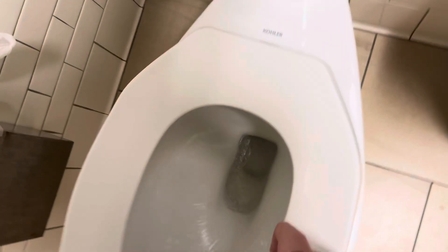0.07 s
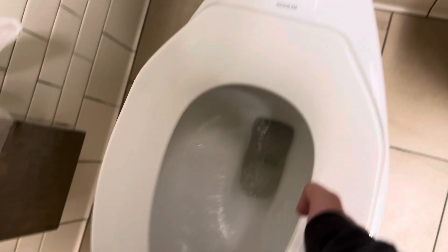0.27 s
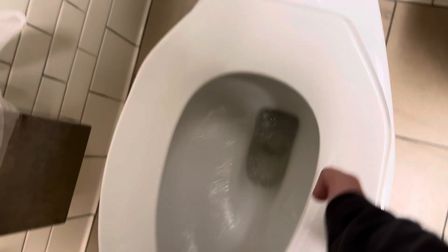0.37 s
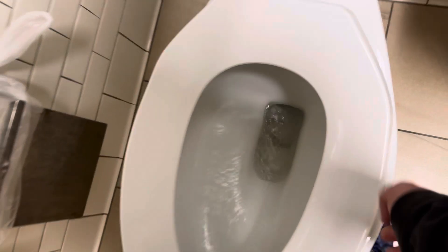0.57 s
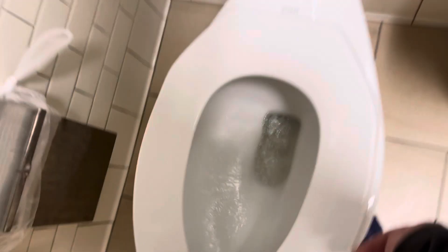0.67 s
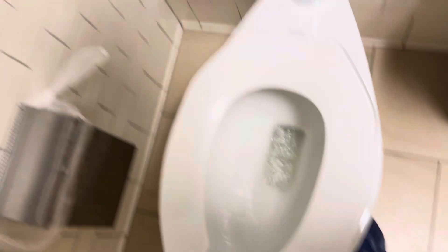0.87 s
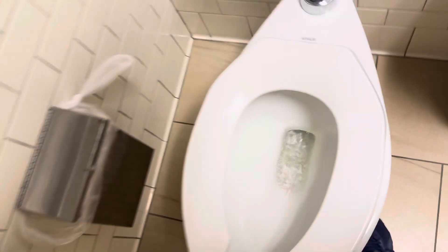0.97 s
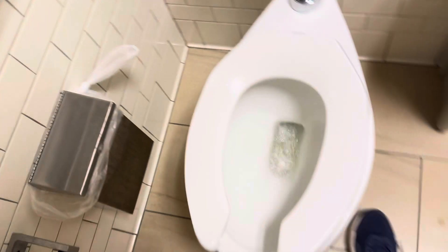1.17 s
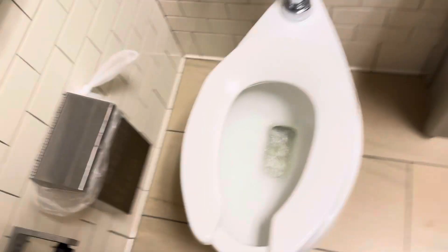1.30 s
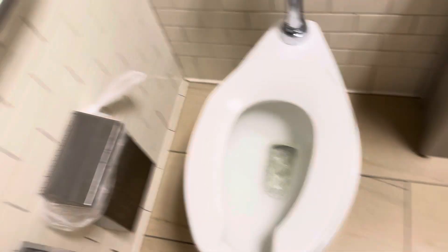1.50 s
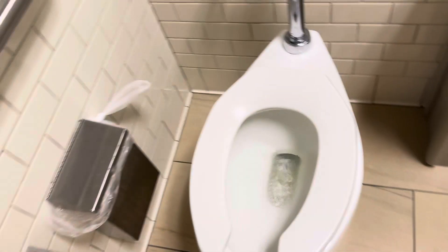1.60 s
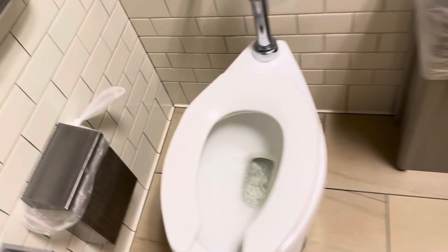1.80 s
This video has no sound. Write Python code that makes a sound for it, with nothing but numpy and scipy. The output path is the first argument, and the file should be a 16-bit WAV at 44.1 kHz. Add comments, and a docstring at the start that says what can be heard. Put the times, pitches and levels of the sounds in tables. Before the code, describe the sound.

A plastic toilet seat drops onto the porcelain bowl nearby with one sharp bang that rings briefly in a small tiled restroom. Faint clothing rustle and two soft footsteps follow over a low ventilation hum.

```python
"""Small tiled restroom: a plastic toilet seat drops onto the porcelain bowl.
Its bumpers land within milliseconds: one hard clack, then a smaller rebound. Bowl and stall ring
in beating mode pairs; the ceiling returns a slap, the tiles a bright tail.
Ventilation hums throughout. A brief low rumble precedes the drop.
Clothes rustle and shoes knock softly as someone steps back."""
import sys
import numpy as np
from scipy import signal
from scipy.fft import rfft, irfft, next_fast_len
from scipy.io import wavfile

SR = 44100
rng = np.random.default_rng(int(sys.argv[2]) if len(sys.argv) > 2 else 0)


def materialize(psi):
    """Save the field psi as 16-bit PCM at rate SR to the path in sys.argv[1].

    A 1-D psi becomes a single channel; in a 2-D psi each row is a channel.
    """
    bounded = np.clip(np.atleast_2d(psi).T, -1, 1)
    quanta = np.round(bounded * 32767).astype(np.int16)
    wavfile.write(sys.argv[1], SR, quanta)


N = 81585
FFT_SIZE = next_fast_len(N)
TIME_S = np.arange(N) / SR
BIN_HZ = np.maximum(np.fft.rfftfreq(FFT_SIZE, 1 / SR), 1)

# Stereo likeness of the room. Each row: frequency in Hz, left-right correlation.
ROOM_CORRELATION = [(80, 1), (280, .82), (600, 0.84), (1200, 0.53), (4000, .25), (12000, 0.3)]
# Duct rumble. Each row: frequency in Hz, relative density in dB.
DUCT_SPECTRUM = [(25, -19), (45, -12), (65, -5.5), (90, 0), (125, -9.5), (175, -8.5), (230, -22),
                 (300, -22), (420, -28), (600, -36), (850, -43.5), (2000, -56), (5000, -61.5), (9000, -66),
                 (11000, -45.5), (15500, -63.5)]
# Ventilation hum. Each row: centre in Hz, level in dB, width in Hz.
HUM_LINES = [(89.5, -48, 30), (117.93, -54, 7.3), (146, -57, 8), (188, -56.5, 29), (286.4, -68.5, 8.6),
             (580, -77, 6.1)]
# Rustle envelope. Each row: time in seconds, level in dB.
RUSTLE_LEVELS = [(0, -62.5), (.08, -72.5), (.5, -72.5), (.7, -72.5), (.93, -73), (1.02, -68.5), (1.18, -75),
                 (1.3, -93), (1.47, -75.5), (1.62, -78.5), (1.65, -68), (1.74, -64), (1.85, -64.5)]
# Cloth friction. Each row: frequency in Hz, relative density in dB.
CLOTH_SPECTRUM = [(300, 1.5), (1000, 2), (2200, 1), (3000, -3.5), (4500, -5), (7500, -8), (9500, -20),
                  (15500, -17.5)]
# Jacket brushes. Each row: start in seconds, level in dB, rise in seconds, T60 in seconds,
# centre in Hz, half width in octaves.
JACKET_BRUSHES = [(0.015, -60, 0.00054, 0.066, 3800, 0.38), (0.081, -62, 0.0092, 0.2, 7030, 0.062),
                  (.114, -60, 0.00083, 0.027, 2460, 0.89), (0.167, -65.5, .003, 0.14, 4000, 0.61),
                  (.44, -57.5, 0.021, 0.46, 4170, 0.53), (.665, -59, 0.023, 0.16, 4430, 0.43),
                  (.83, -64, .008, .2, 4570, 0.54), (.872, -67.5, 0.0038, 0.15, 4960, 0.55),
                  (.995, -64, 0.0153, .25, 2590, 1), (1.075, -69, .006, 0.12, 4500, .5),
                  (1.18, -60, 0.023, 0.19, 8000, 0.86), (1.722, -59.5, 0.0089, 0.13, 3000, .8),
                  (1.823, -56.5, .0005, .09, 11200, 0.47), (1.828, -57.5, 0.0044, 0.13, 6460, 0.093)]
# Low swell. Each row: frequency in Hz, relative density in dB.
SWELL_SPECTRUM = [(30, -4.5), (130, 3.5), (290, -1.5), (450, -22.5), (1500, -47)]
# Shoe knocks. Each row: start in seconds, level in dB, low-pass cutoff in Hz.
SHOE_KNOCKS = [(0.104, -57.5, 1497), (0.796, -60.5, 1410), (1.636, -45.5, 980), (1.776, -46, 2200)]
# Knock colour. Each row: frequency in Hz, relative density in dB.
SHOE_SPECTRUM = [(100, -7), (280, 3), (550, -3.5), (1000, -2), (1500, -11), (3000, -15), (8000, -24.5)]
# Bumper landings, the last two on the rebound. Each row: start in seconds, gain in dB,
# low-pass cutoff in Hz.
BUMPER_CONTACTS = [(0.2216, -2, 1400), (0.2249, -5.5, 6200), (0.2258, 2, 11000), (0.2284, -2.5, 6498),
                   (.2336, -10.5, 2200), (0.2584, -6, 2201), (0.2611, -8.5, 3500)]
# Contact crack. Each row: frequency in Hz, relative density in dB.
CRACK_SPECTRUM = [(150, -22), (400, -1), (1000, 0), (2500, -1.5), (4500, -4.5), (7500, -8.5), (9100, -20.5),
                  (11000, -6), (15500, -16.5)]
# Stereo likeness of the crack. Each row: frequency in Hz, left-right correlation.
CRACK_CORRELATION = [(500, 0.95), (2500, .3), (9000, -0.19)]
# Seat modes. Each row: frequency in Hz, relative level in dB, T60 in seconds, left minus right in dB.
SEAT_MODES = [(323, -27, .045, -2), (465, -18.5, .026, -2.5), (789, -13.5, .014, 1.5),
              (1041, -12, 0.03, -0.5), (1309, -13, 0.041, -2), (1680, -19, .022, 1),
              (2220, -21.5, 0.007, 2.5), (2600, -21, 0.01752, 2), (3445, -17, 0.034, 4.5),
              (3704, -18.5, 0.027, 3), (3860, -19.5, 0.027, 4.5), (4530, -17.5, .022, 2),
              (4970, -21.5, 0.024, 3.5), (6880, -23.5, 0.028, -0.5)]
# Bowl and stall modes. Each row: frequency in Hz, relative level in dB, T60 in seconds, beat in Hz.
BOWL_MODES = [(262, -29.5, .22, 22), (281, -31, .5, 6), (487, -36, .36, 9), (647, -37, .3, 12),
              (729, -36, .62, 5), (952, -25, .35, 10.5), (1035, -33, .26, 22), (1150, -31, .24, 28),
              (1194, -32, .25, 17), (1298, -31, .29, 26), (1350, -33, .29, 11), (1407, -35, .27, 8),
              (1650, -27, .21, 6), (2342, -33, .22, 15)]
# Tile reverberation. Each row: frequency in Hz, relative density in dB, T60 in seconds.
ROOM_BANDS = [(190, -21, .9), (310, -7.5, .72), (418, -13, .55), (520, -7, .48), (748.6, -7, 0.45),
              (900, -6, .33), (1116, 1, 0.31), (1364, -0.5, .31), (1520, -9, 0.4), (1680, -4, .29),
              (2430, -1, .27), (2950, -8, .28), (4270, -7, 0.26), (6000, -17, .29), (7940, -19.5, 0.26),
              (8498, -36.5, .15), (10714, -26.5, 0.22), (15500, -36.5, .16)]

RING_AGE_S = TIME_S - BUMPER_CONTACTS[0][0] - 0.004   # bowl and room start 4 ms after first contact


def from_db(db):
    """Decibels to gain."""
    return 10 ** (np.asarray(db) / 20)


def unit_rms(x):
    """Scale to rms 1."""
    return x / np.sqrt(np.mean(np.abs(x) ** 2) + 1e-20)


def per_bin(table):
    """A table's second column at each FFT bin, interpolated over log frequency."""
    table = np.array(table)
    return np.interp(np.log(BIN_HZ), np.log(table[:, 0]), table[:, 1])


def to_time(spectrum):
    """Stereo spectrum to N samples."""
    return irfft(spectrum, FFT_SIZE)[:, :N]


def lowpass(x, cutoff_hz):
    """Two-pole low-pass."""
    return signal.sosfilt(signal.butter(2, cutoff_hz, fs=SR, output="sos"), x + 1e-18)


def decay(age_s, t60_s, rise_s=1e-5):
    """Exponential rise and decay from age zero."""
    age_s = np.maximum(age_s, 0)
    return (1 - np.exp(-age_s / rise_s)) * np.exp(-np.log(1000) * np.minimum(age_s / t60_s, 4))


def white_spectrum(correlation=ROOM_CORRELATION):
    """Spectrum of partly correlated stereo white noise."""
    mid, side = rfft(rng.standard_normal((2, FFT_SIZE)))
    alike = per_bin(correlation)
    return np.sqrt((1 + alike) / 2) * mid + np.sqrt((1 - alike) / 2) * side * [[1], [-1]]


def noise(colour, correlation=ROOM_CORRELATION):
    """Coloured stereo noise, rms about 1."""
    return to_time(white_spectrum(correlation) * unit_rms(from_db(per_bin(colour))))


def bandpass_gain(offset):
    """Flat-topped band, rms 1; offset from the centre in half widths."""
    return unit_rms(1 / (1 + offset ** 4))


def split_bands(spectrum, table):
    """Overlapping band signals, one per table row."""
    log_centres = np.log(np.array(table)[:, 0])
    return [to_time(spectrum * np.interp(np.log(BIN_HZ), log_centres, row)) for row in np.eye(len(table))]


def ventilation(duct_db=-47, fan_hz=196.1, fan_db=-50.5, third_db=-70.5):
    """Duct rumble with faint hiss, wavering hum lines, a steady fan note with its third harmonic."""
    duct = from_db(duct_db) * noise(DUCT_SPECTRUM)
    lines = sum(from_db(db) * bandpass_gain(2 * (BIN_HZ - hz) / width_hz)
                for hz, db, width_hz in HUM_LINES)
    hum = to_time(lines * white_spectrum())
    phase = 2 * np.pi * fan_hz * TIME_S
    fan = from_db(fan_db) * np.sin(phase) + from_db(third_db) * np.sin(3 * phase)
    return duct + hum + fan


def clothes(flicker_rms_db=2.5, flicker_cutoff_hz=34.94):
    """Cloth rustles, each band flickering on its own."""
    out = 0
    level_db = np.interp(TIME_S, *np.transpose(RUSTLE_LEVELS))
    cloth = rfft(noise(CLOTH_SPECTRUM), FFT_SIZE)
    for band in split_bands(cloth, CLOTH_SPECTRUM):
        flicker_db = flicker_rms_db * unit_rms(lowpass(rng.standard_normal(N), flicker_cutoff_hz))
        out += from_db(level_db + flicker_db) * band
    return out


def jacket():
    """A moving jacket brushes and ticks: short bursts of bright noise."""
    out, white = 0, white_spectrum()
    for start_s, db, rise_s, t60_s, hz, half_width_oct in JACKET_BRUSHES:
        brush = to_time(white * bandpass_gain(np.log2(BIN_HZ / hz) / half_width_oct))
        out += from_db(db) * decay(TIME_S - start_s, t60_s, rise_s) * brush
    return out


def low_swell(peak_s=0.055, half_width_s=0.12, level_db=-47.5):
    """A low rumble swells and fades before the drop."""
    swell = np.exp(-np.minimum(((TIME_S - peak_s) / half_width_s) ** 2, 20))
    return from_db(level_db) * swell * noise(SWELL_SPECTRUM)


def shoes(t60_s=0.28, rise_s=0.0007):
    """Dull shoe knocks linger in the room."""
    knock = noise(SHOE_SPECTRUM)
    return sum(from_db(db) * lowpass(knock * decay(TIME_S - start_s, t60_s, rise_s), cutoff_hz)
               for start_s, db, cutoff_hz in SHOE_KNOCKS)


def seat(crack_db=-11, crack_t60_s=0.011, stereo_lag_s=0.00003, spread_at_1khz_rad=0.69):
    """Each bumper contact cracks and rings the damped seat; high modes differ more between sides."""
    out = np.zeros((2, N))
    crack = noise(CRACK_SPECTRUM, CRACK_CORRELATION)
    age_s = TIME_S[:SR // 10]
    sides = np.array([[0.5], [-0.5]])
    for start_s, gain_db, cutoff_hz in BUMPER_CONTACTS:
        span = slice(int(start_s * SR), int(start_s * SR) + len(age_s))
        hit = from_db(crack_db) * decay(age_s, crack_t60_s) * crack[:, span]
        for k, (hz, db, t60_s, pan_db) in enumerate(SEAT_MODES):
            skew_rad = spread_at_1khz_rad * np.sqrt(hz / 1000) * rng.standard_normal()
            phase = 2 * np.pi * hz * (age_s - stereo_lag_s * sides) + skew_rad * sides
            hit += (-1) ** k * from_db(db + pan_db * sides) * decay(age_s, t60_s) * np.sin(phase)
        out[:, span] += from_db(gain_db) * lowpass(hit, cutoff_hz)
    return out


def bowl_and_stall(gain_db=2, twin_db=-5.5, rise_s=0.01, spread_rad=0.6):
    """Each long mode beats against a close twin as it dies."""
    out, age_s = np.zeros((2, N)), RING_AGE_S[:SR]
    for hz, db, t60_s, beat_hz in BOWL_MODES:
        phase = 2 * np.pi * hz * age_s + rng.uniform(0, 2 * np.pi)
        phase = phase + spread_rad * rng.standard_normal((2, 1))
        pair = np.sin(phase) + from_db(twin_db) * np.sin(phase + 2 * np.pi * beat_hz * age_s)
        out[:, :SR] += from_db(db + gain_db) * decay(age_s, t60_s, rise_s) * pair
    return out


def room(level_db=-17, rise_s=0.0046):
    """Dense tile reflections, a ceiling slap and a slower tail from beyond the stall."""
    ripple_db, ripple_step_hz = 8.5, 35   # the room favours some pitches over their neighbours
    slap_db, slap_delay_s, slap_t60_s, slap_rise_s = -5, 0.035, 0.078, 0.00087
    late_db, late_t60_ratio, late_max_t60_s = -22, 3, 0.81
    ripple = np.interp(BIN_HZ / ripple_step_hz, np.arange(SR // 10), rng.uniform(-1, 1, SR // 10))
    colour = unit_rms(from_db(per_bin(ROOM_BANDS) + ripple_db * ripple))
    field = from_db(level_db) * colour * white_spectrum()
    slap = from_db(slap_db) * decay(RING_AGE_S - slap_delay_s, slap_t60_s, slap_rise_s)
    out = 0
    for band, (_, _, t60_s) in zip(split_bands(field, ROOM_BANDS), ROOM_BANDS):
        early = decay(RING_AGE_S, t60_s, rise_s)
        late = from_db(late_db) * decay(RING_AGE_S, min(t60_s * late_t60_ratio, late_max_t60_s), rise_s)
        out += band * np.sqrt(early ** 2 + late ** 2 + slap ** 2)
    return out


def scene():
    """The slam in its room, over movement and ventilation."""
    slam = seat() + room() + bowl_and_stall()
    return slam + shoes() + clothes() + jacket() + ventilation() + low_swell()


def record(dry):
    """Soft clip, then a steep low-pass."""
    ceiling, stopband_db, stopband_hz = 1.1, 70, 17000
    rounded = ceiling * np.tanh(dry / ceiling)
    return signal.sosfilt(signal.cheby2(12, stopband_db, stopband_hz, fs=SR, output="sos"), rounded)


dry = scene()
out = record(dry)
materialize(out)
```